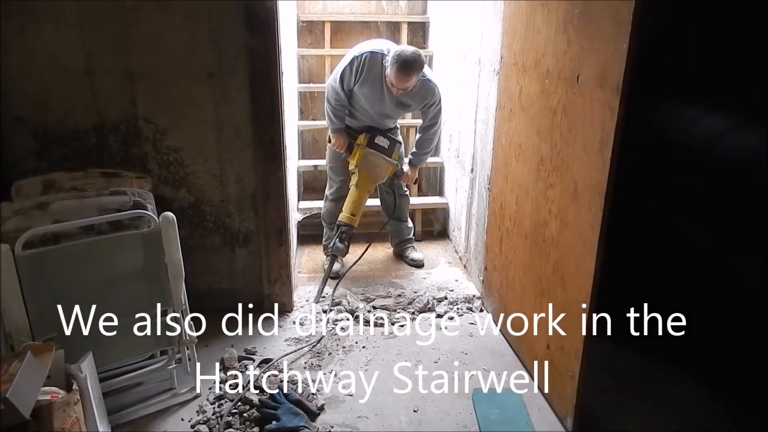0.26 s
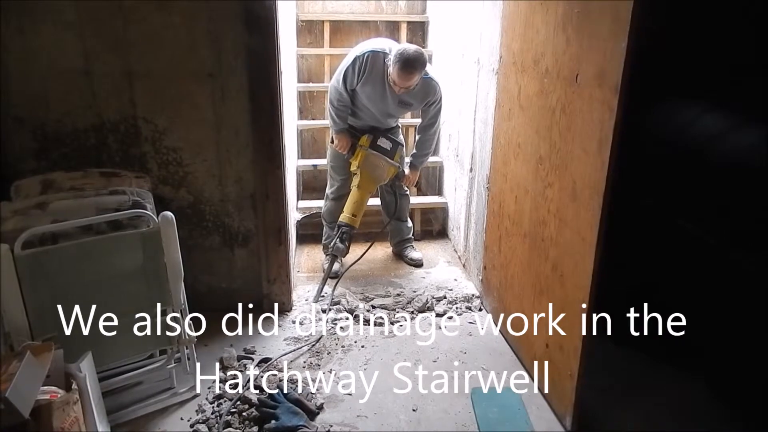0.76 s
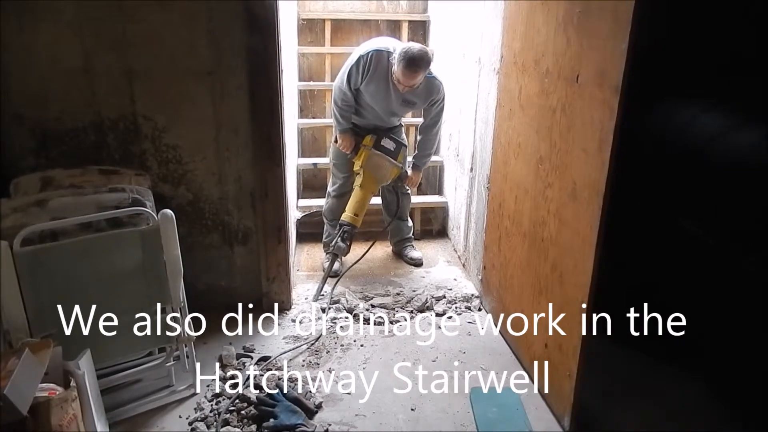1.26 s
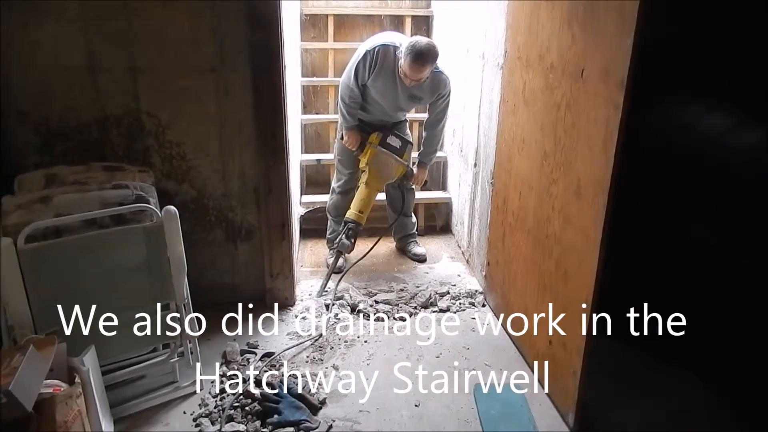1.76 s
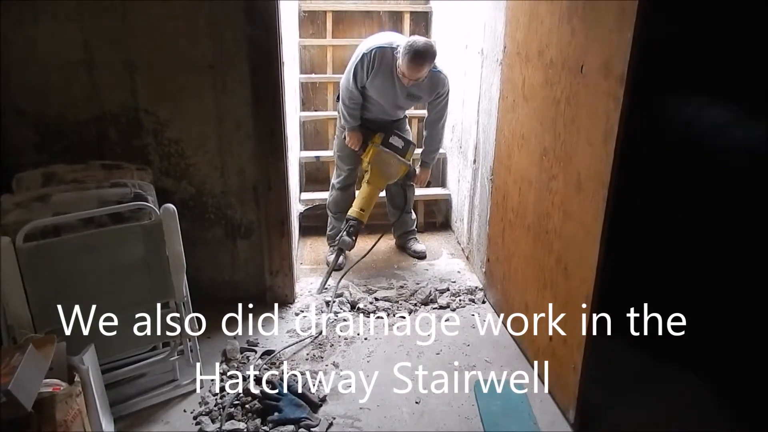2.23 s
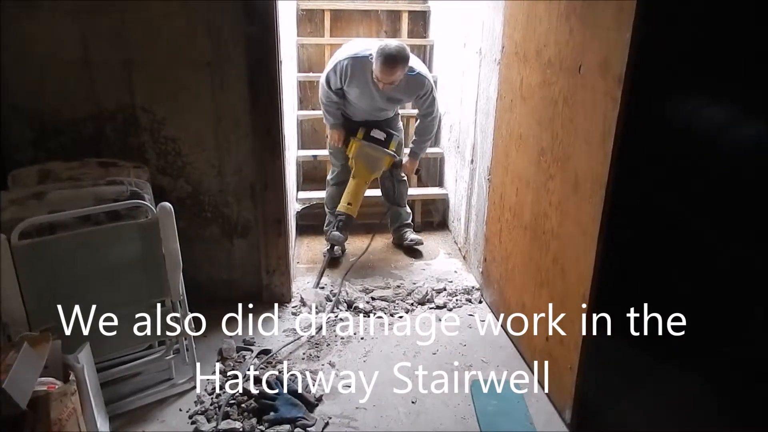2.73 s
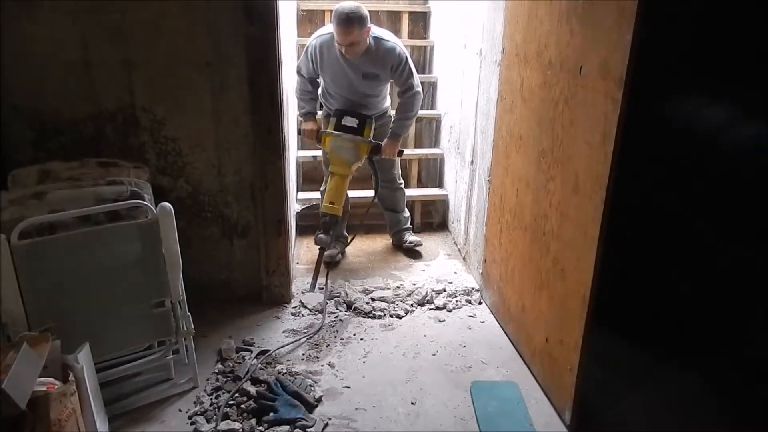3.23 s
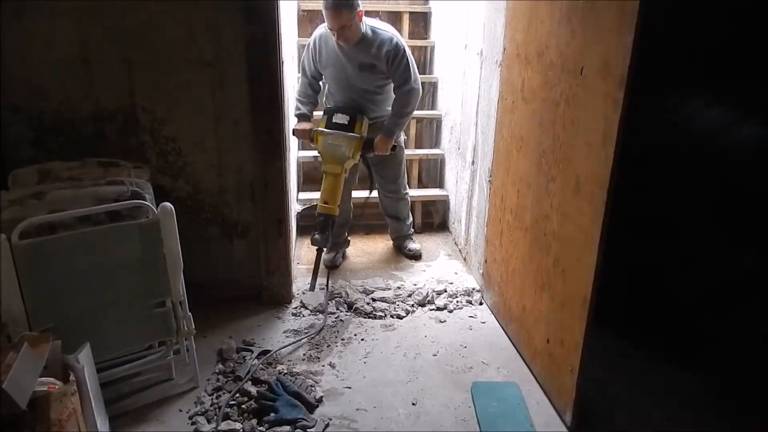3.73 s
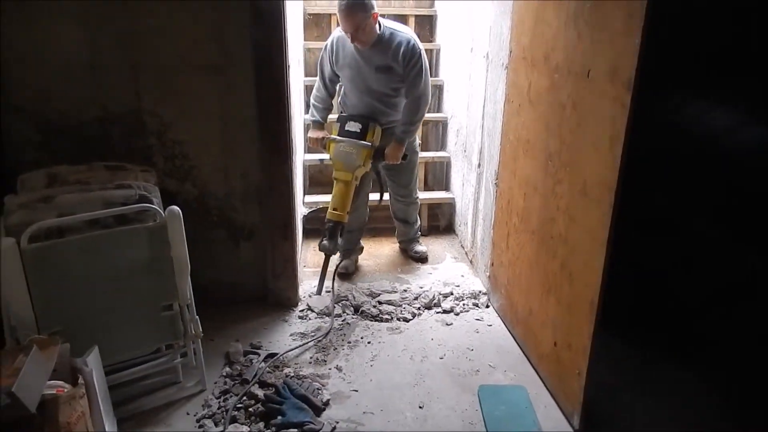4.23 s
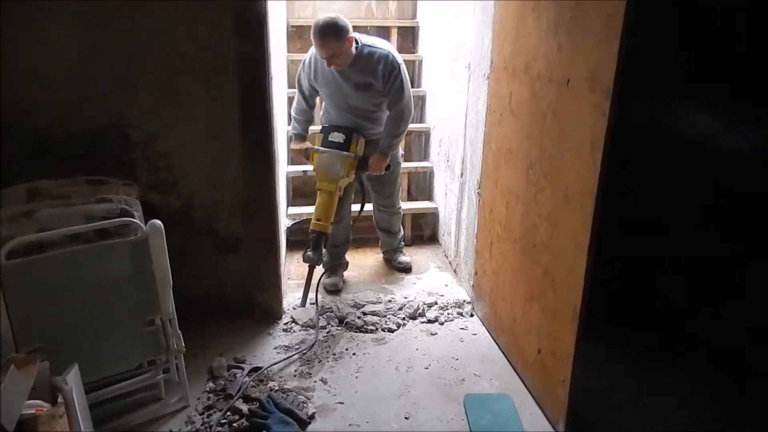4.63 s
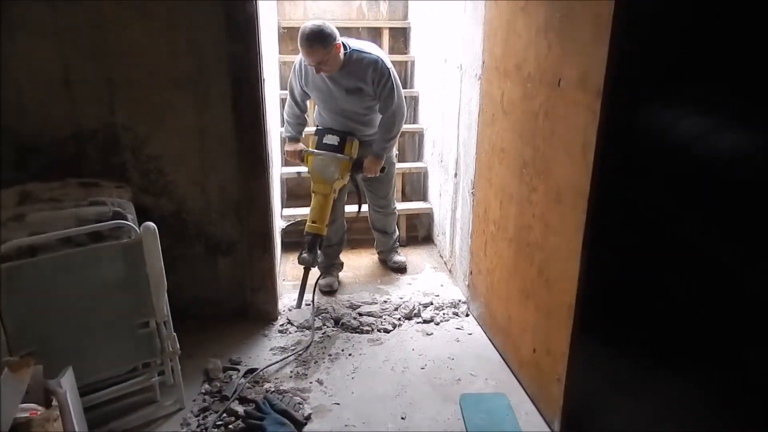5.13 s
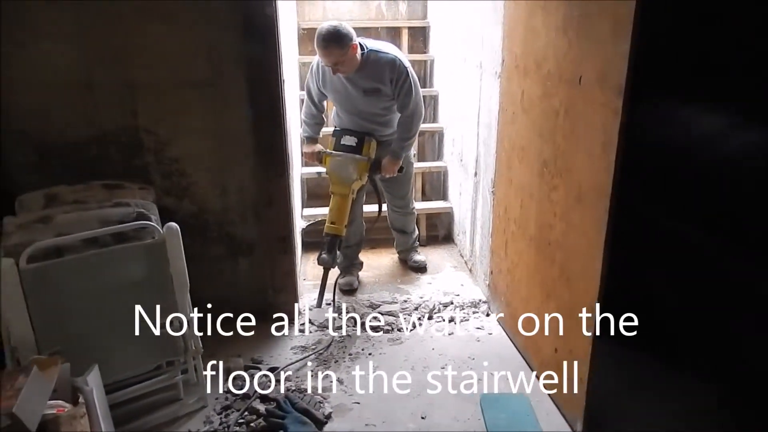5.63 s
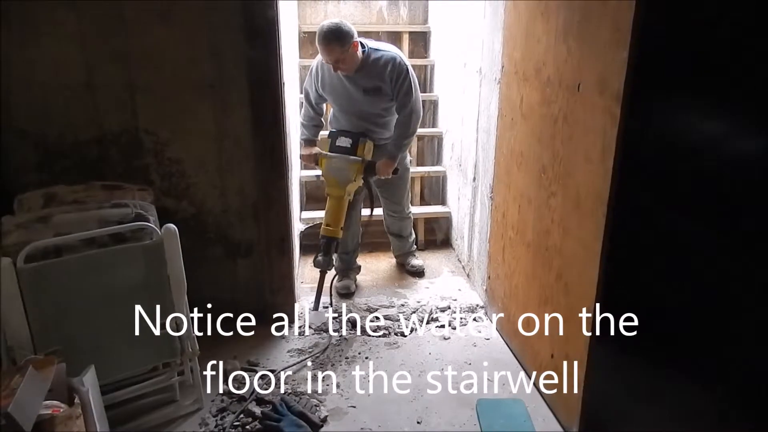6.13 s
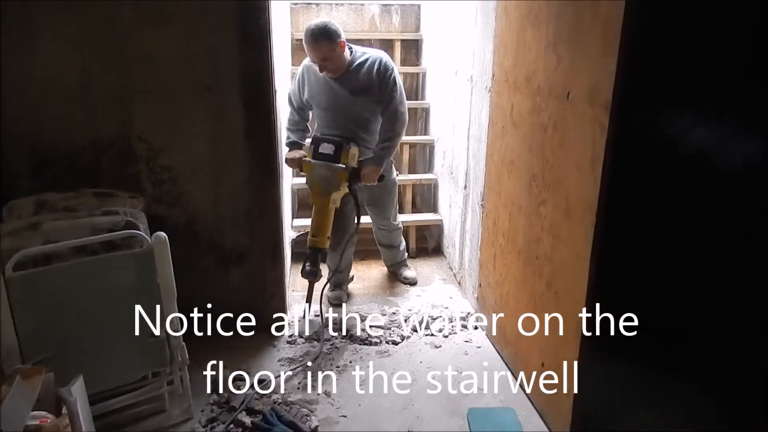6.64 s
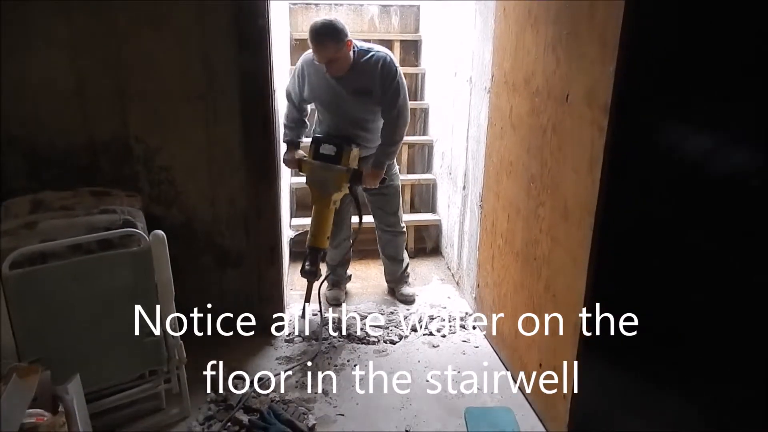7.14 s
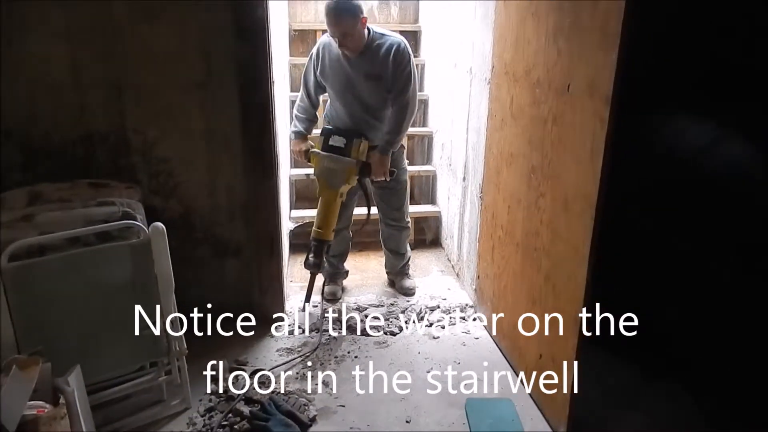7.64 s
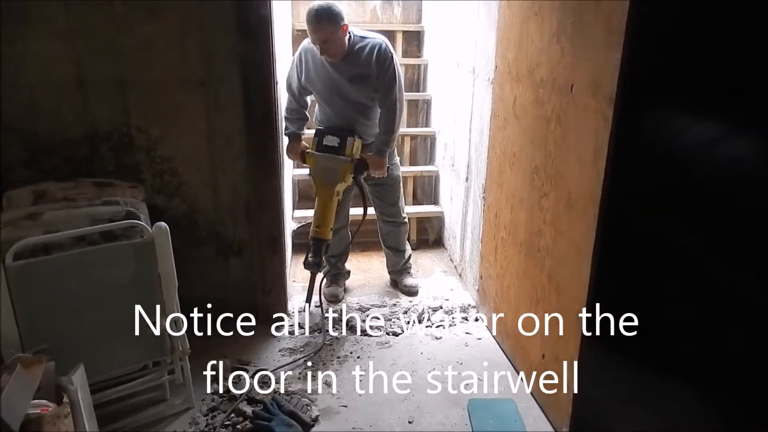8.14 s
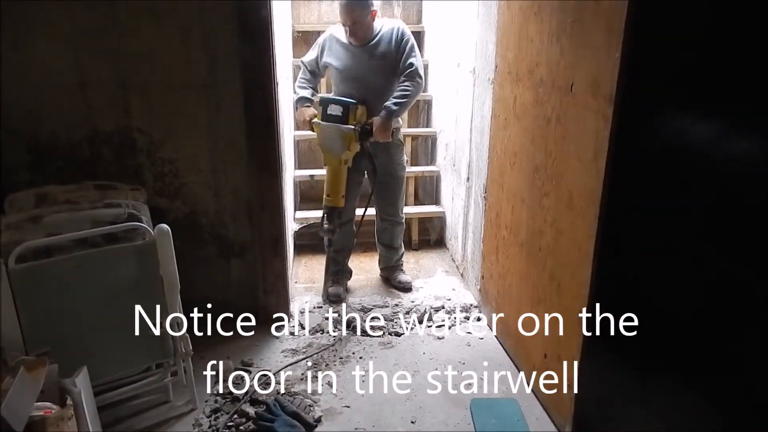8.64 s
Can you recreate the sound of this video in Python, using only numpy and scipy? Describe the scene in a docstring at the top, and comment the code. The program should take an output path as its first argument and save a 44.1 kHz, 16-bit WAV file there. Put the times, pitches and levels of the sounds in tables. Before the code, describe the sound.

An electric demolition hammer pounds concrete at a rapid steady rate in a reverberant stairwell, then slows and drops with a final clank.

```python
"""In a stairwell, an electric demolition hammer chisels a concrete floor, about 14.5 blows a second.
At first the loose slab clacks loudly under the steel; then the bit bites into rubble and rings freely.
The motor coasts down, the blows thin out to idle strokes, and the chisel drops with one last clank.
Knocks, chips and gears are shaped noise, the chisel's ring is clusters of blurred sine lines,
and the motor adds a whine that follows the crank."""
import sys
import numpy as np
from scipy import signal
from scipy.fft import rfft, irfft, next_fast_len
from scipy.io import wavfile
from scipy.ndimage import uniform_filter1d, map_coordinates

SR = 44100
rng = np.random.default_rng(int(sys.argv[2]) if len(sys.argv) > 2 else 0)


def transcribe(u):
    """Save the signal u as a 16-bit wav file named by the first command-line argument.

    u: samples, shape (n,) or (channels, n), limited to [-1, 1]; the rate is SR.
    q: integer samples, one column per channel.
    """
    v = np.clip(np.atleast_2d(u).T, -1, 1)
    q = np.round(v * 32767).astype(np.int16)
    wavfile.write(sys.argv[1], SR, q)


N = 392037
LIFE = np.arange(int(.22 * SR)) / SR  # time axis of one hit (s)
TOOL_DETUNE = .022  # spread of the tool's pitch from blow to blow (share)

# spectrum of the loose slab: (frequency [Hz], level [dB per Hz])
SLAB_SPECTRUM = [(25, -23), (59, -35), (100, -18.5), (149, -23.5), (291, -13), (476, -25), (532, -10.5),
                 (624, -17), (886, -7), (975, -11.5), (1200, -4), (1450, -3), (2030, -7), (2380, -7.5),
                 (3320, -19), (4500, -25.5), (5850, -63), (9900, -120)]
# resonances of the slab: (frequency [Hz], width [Hz], level [dB])
SLAB_RESONANCES = [(275, 90, 3.5), (530, 40, 4), (880, 70, 5.5), (1230, 35, 5), (1287, 27, 6),
                   (1485, 28, 8), (1680, 44, 6.5), (2330, 43, 6), (3000, 120, 6), (3660, 130, 9)]
# spectrum of cracking concrete, also of the air puff: (frequency [Hz], level [dB per Hz])
CHIP_SPECTRUM = [(1200, -42), (2500, 3.5), (4200, -2.5), (6000, 1), (7600, -1), (9800, 2), (10800, 2.5),
                 (11800, -8), (13200, -15), (15500, -26)]
# spectrum of motor and gears, also of the idle strokes: (frequency [Hz], level [dB per Hz])
MOTOR_SPECTRUM = [(30, -26), (70, -9), (160, -16), (300, -7), (450, -4.5), (850, -4.5), (1200, -1),
                  (1700, -0.5), (2500, -6.5), (3300, -7), (5400, -13.5), (7400, -23), (10000, -18.5),
                  (14000, -48)]
# resonances in that spectrum: (frequency [Hz], width [Hz], level [dB])
MOTOR_RESONANCES = [(275, 60, 7), (540, 35, 6), (865, 70, 5), (1400, 200, 2), (2200, 160, 5),
                    (2500, 170, 7), (4420, 170, 7)]
# how hard the bit bears on the concrete: (time [s], chipping [dB], knock [dB]), before trims and scatter
BITE_LEVELS = [(0, -22, -18.5), (.19, -19.5, -17.5), (.32, -25, -24), (.55, -23, -19.5), (1, -22.5, -19.5),
               (1.2, -25, -21), (2.04, -23.5, -20), (2.42, -22.5, -31.5), (2.85, -22, -27.5),
               (3.7, -25.5, -27.5), (4.5, -22.5, -27.5), (4.68, -26.5, -30), (4.92, -18.5, -26),
               (5.13, -26.5, -33), (5.3, -22.5, -23.5), (5.8, -20.5, -29), (6.03, -25, -29.5),
               (6.75, -24, -25), (7.88, -23.5, -28.5), (8.02, -29, -32.5), (8.2, -24, -30.5)]


def amp(db):
    """Decibels to gain."""
    return 10 ** (np.asarray(db) / 20)


def along(points, hz):
    """Read (Hz, value) points on a log frequency axis."""
    f, v = np.transpose(points)
    return np.interp(np.log(hz + 1), np.log(f + 1), v)


def at(curve, s):
    """Each column of a control curve at the times s."""
    times, *columns = np.transpose(curve)
    return np.array([np.interp(s, times, c) for c in columns])


def shape(spectrum, peaks, hz):
    """Level in dB of a broad spectrum with narrow resonances on it."""
    return along(spectrum, hz) + sum(g / (1 + (2 * (hz - c) / w) ** 2) for c, w, g in peaks)


def resonance(hz, centre_hz, width_hz):
    """Response of one damped mode, 1 at its centre."""
    return 1j * hz * width_hz / (centre_hz ** 2 - hz ** 2 + 1j * hz * width_hz)


def filtered(x, response):
    """Filter x by a complex response of frequency."""
    n = x.shape[-1]
    m = next_fast_len(n + 4096)
    return irfft(rfft(x, m) * response(np.fft.rfftfreq(m, 1 / SR)), m)[..., :n]


def colour(x, spectrum, peaks=()):
    """Causal minimum-phase filter with a broad spectrum and narrow resonances on it."""
    m = 2 * len(LIFE)
    hz = np.fft.rfftfreq(m, 1 / SR)
    db = shape(spectrum, peaks, hz)
    # folding the cepstrum forward in time keeps onsets sharp
    cepstrum = irfft(np.log(amp(np.maximum(db, -90))))
    cepstrum[1:m // 2] *= 2
    cepstrum[m // 2 + 1:] = 0
    return irfft(rfft(x, m) * np.exp(rfft(cepstrum)), m)[..., :len(LIFE)]


def sized(x):
    """Scale each channel of a hit so that its energy equals rms 1 over 40 ms."""
    return x / np.sqrt(np.sum(x ** 2, axis=-1, keepdims=True) / (.04 * SR) + 1e-20)


def fade(t60, delay=0):
    """An exponential decay that starts after a delay."""
    return (LIFE >= delay) * amp(-60 * np.abs(LIFE - delay) / t60)


def swell(rise, delay=0):
    """A rounded onset from 0 to 1."""
    return 1 - np.exp(-((LIFE - delay) / rise) ** 2)


def burst(envelope, count=1):
    """Mid/side noise bursts under one envelope."""
    return envelope * rng.standard_normal((count, 2, len(LIFE)))


def even(x, size):
    """Flatten the broad spectrum of a burst and keep its fine comb."""
    z = rfft(x)
    power = np.abs(uniform_filter1d(np.abs(z) ** 2, size))
    return irfft(z / np.sqrt(power + 1e-12), len(LIFE))


def wobble(rate):
    """A smooth random curve, rate knots a second."""
    knots = rng.standard_normal(int(N * rate / SR) + 4)
    return map_coordinates(knots, [np.arange(N) * rate / SR])


def add(track, s, hit):
    """Mix a hit into the track at time s."""
    start = round(s * SR)
    lo, hi = max(start, 0), min(start + len(LIFE), N)
    track[:, lo:hi] += hit[:, lo - start:hi - start]


def crank():
    """Time, speed, and turns of the crank since the first blow; every whole turn is a blow while it strikes."""
    # speed sags under load and coasts down once the trigger is released: (time [s], speed [blows per s])
    crank_speed = [(0, 14.702), (1.4, 14.702), (1.8, 14.507), (2, 14.572), (2.8, 13.769), (3.2, 14.436),
                   (4.4, 14.182), (4.8, 14.376), (6.6, 14.838), (7.4, 14.759), (7.72, 9.177), (7.98, 8.109),
                   (8.15, 5.253), (8.9, 3.3)]
    first_s = -.0145  # the first blow
    t = np.arange(round(first_s * SR), N) / SR
    rate = np.interp(t, *np.transpose(crank_speed))
    return t, rate, np.cumsum(rate) / SR


def blows():
    """One row for each blow or rebound: (s, then dB of chipping, knock, clack, bonk and the five rings)."""
    # how firmly the bit seats in the tool: (time [s], clack [dB], bonk [dB])
    seating = [(0, -58, -38), (2.05, -48, -60), (2.18, -62, -35), (2.45, -48, -49), (2.65, -36, -58),
               (3.5, -37, -44), (3.9, -49, -43), (4.6, -39, -39), (5, -35.5, -41.5), (5.8, -40, -35.5),
               (6.2, -41, -38.5), (7.3, -59, -43), (8.2, -42, -45)]
    # how freely the steel rings as the rubble loosens its grip:
    # (time [s], low bend [dB], bending [dB], lengthwise [dB], high bend [dB], shimmer [dB])
    ring_levels = [(0, -45, -50, -56, -49, -54), (2.2, -41, -55, -42, -52, -43),
                   (2.33, -39, -40, -32, -39, -30.5), (2.8, -35, -36, -38, -37, -33),
                   (3.05, -42.5, -41.5, -42, -36, -43), (3.4, -33.5, -34, -36.5, -39, -31),
                   (3.7, -47, -44, -40, -33, -40), (4.15, -39, -45, -47, -45, -39.5),
                   (4.45, -34, -33, -37, -33, -33), (4.72, -26.5, -27.5, -51, -33, -31),
                   (4.98, -35.5, -29.5, -51, -38, -41), (5.35, -30, -39, -33, -38, -35),
                   (5.95, -31.5, -30.5, -37, -33.5, -40), (6.12, -38, -32, -41, -41, -34),
                   (6.41, -46, -42, -42, -34.5, -34), (6.5, -48, -32, -28.5, -31.5, -34),
                   (7.35, -39.5, -39, -37.5, -41.5, -41), (7.8, -40, -39, -38, -46, -44.5),
                   (8.1, -44, -41, -47, -44, -50)]
    # blows that land squarely or glance off:
    # (time [s], extra chipping [dB], extra knock [dB], extra clack [dB])
    square_blows = [(.122, 0, -0.5, -2), (.258, -6, -6, 0), (2.168, 1, -1, 2), (2.45, -4, 2, -10),
                    (3.09, 0.5, 0.5, -11), (3.233, 3, -1.5, 4.5), (3.51, -0.5, 0, -12), (3.65, 1, -1, -14),
                    (3.79, 1, -3.5, -12), (3.86, 2.5, 2, 12), (3.93, 4, 3, 9), (4.28, 1, -1.5, 12),
                    (4.49, -1, 4.5, -2), (4.7, -1, -2, -9), (4.841, 0, 5, 5), (4.91, -2, 1, 1),
                    (5.26, 1.5, 1, 0), (5.6, 0.5, 2, 8.5), (5.74, -3, 2.5, 5), (5.81, -1.5, 2.5, 5),
                    (7.024, 0, 3, -3), (7.506, 3, 2, 0), (8.2, -4.5, 0, -6)]
    # blows after which the chisel jumps free and pings, or is choked:
    # (time [s], extra low bend [dB], bending [dB], lengthwise [dB], high bend [dB], shimmer [dB])
    pings = [(2.38, -13, 5, -4, 0, 4), (2.45, -2, 7, 0, 6, 3), (3.09, 1, 11, 5, 0, 0),
             (3.16, 7, 9, -2, 0, -5), (3.233, 12.5, 7, 6, 9.5, 3), (3.51, 1.5, 0.5, 3, 2, 4),
             (3.65, 10, 2, -6, 2, 0), (3.93, 0, 2, 7, -3, 0), (4, -8, 6, 8, 5, 8),
             (4.63, 0.5, 5.5, 0, 0, 0), (4.841, 8, 1.5, 0, 2, 3), (5.05, 7.5, -2, 0, 9.5, 0),
             (5.26, 6, 3, -6, 4, 4), (5.46, -1, 9.5, -5, 0, -10), (5.6, 1, 9, 1, 5.5, 0),
             (5.87, 4, 5, -4, -4, 0), (6.62, 9, -3, 1.5, -3, 0), (6.76, 7, -1, 5, -2, 0),
             (6.82, 3, -4, -9, 0, 0), (7.024, 0, 7, 9, 6, 0), (7.36, 6, 6, 9.5, 14, 4),
             (7.68, -1.5, 0, 8, 5, 0)]
    # the bit jumps and lands again between two blows: (time [s], chipping [dB], knock [dB])
    landings = [(.215, -27, -32), (.235, -26, -30), (8.064, -35, -36)]
    last_s = 8.3  # from here the piston is too slow to strike

    t, _, turns = crank()
    s = np.interp(np.arange(np.interp(last_s, t, turns)), turns, t)
    scatter_db = [1, 1] + [1.5] * 7  # chance from blow to blow: chipping, knock, then the ringing parts
    levels = np.vstack([at(BITE_LEVELS, s), at(seating, s), at(ring_levels, s)]).T
    levels = levels + scatter_db * rng.standard_normal((len(s), len(scatter_db)))
    for when, *extra_db in square_blows:
        levels[np.argmin(np.abs(s - when)), :len(extra_db)] += extra_db
    for when, *extra_db in pings:
        levels[np.argmin(np.abs(s - when)), -len(extra_db):] += extra_db
    rebounds = [(*row, *at(seating, row[0]), *at(ring_levels, row[0])) for row in landings]
    return np.vstack([np.column_stack([s, levels]), rebounds])


def knocks(count, bounces, spectrum, peaks, contact_t60, room_db, room_t60, dull_hz, fresh):
    """Each blow repeats one pattern of bright contacts and duller echoes, with a share that is new every time."""
    contacts = echoes = 0
    for s, db in bounces:
        delay = s - bounces[0][0]
        onset = amp(db) * swell(.0011, delay)
        contacts += (onset * fade(contact_t60, delay)) ** 2
        echoes += (onset * amp(room_db) * fade(room_t60, delay)) ** 2

    def dulling(hz):
        return (1 + (hz / dull_hz) ** 4) ** -.5

    def pattern(count):
        bright = burst(np.sqrt(contacts), count)
        return bright + filtered(burst(np.sqrt(echoes), count), dulling)

    def share(hz):
        return np.clip(along(fresh, hz), 0, 1)

    same = sized(even(pattern(count=1), size=27))
    new = sized(pattern(count))
    mix = filtered(same, lambda hz: np.sqrt(1 - share(hz))) + filtered(new, lambda hz: np.sqrt(share(hz)))
    return sized(colour(mix, spectrum, peaks))


def rocked(hit, detune):
    """Slab and tool never sit the same way twice: the pitch shifts and the contacts trade strength."""
    clock = LIFE * (1 + detune * rng.standard_normal())
    knots = np.arange(0, LIFE[-1], .005)  # s
    rattle_db = 1.1 * np.interp(LIFE, knots, rng.standard_normal(len(knots)))
    return sized(amp(rattle_db) * np.array([np.interp(clock, LIFE, channel) for channel in hit]))


def slab_knocks(count):
    """The loose slab rattles under the steel in a close run of contacts; returns first delay (s) and hits."""
    # contacts within one blow: (delay [s], level [dB])
    slab_contacts = [(-.003, -7), (.0013, 2), (.0038, 1), (.0115, -.5), (.0155, -.5), (.0235, -11),
                     (.032, -11)]
    hits = knocks(count, slab_contacts, SLAB_SPECTRUM, SLAB_RESONANCES, contact_t60=.015,
                  room_db=-21.5, room_t60=.26, dull_hz=2000,
                  fresh=[(60, .3), (300, .08), (1800, .17), (3500, .5)])  # (Hz, share)
    return slab_contacts[0][0], hits


def tool_knocks(rows):
    """The tool knocks on rubble over a booming floor, duller with depth; returns first delay (s) and hits."""
    # contacts within one blow: (delay [s], level [dB])
    tool_contacts = [(-.0012, -9), (.0022, -10.5), (.0045, -13), (.0142, -11)]
    # spectrum of the tool: (frequency [Hz], level [dB per Hz])
    tool_spectrum = [(18, -20), (30, -35), (86, -10.5), (150, -13), (250, -6.5), (380, -4), (469, -12),
                     (542, -7.5), (640, -7.5), (837, -6), (1060, -6.5), (1430, -8), (2040, -3.5),
                     (2720, -13), (3020, -8), (3350, -9.5), (4200, -10.5), (5460, -37), (9240, -120)]
    # resonances of the tool: (frequency [Hz], width [Hz], level [dB])
    tool_resonances = [(545, 40, 5.5), (713, 90, 5), (850, 80, 3)]
    # the floor booms higher as the chisel moves to a new spot: (time [s], boom [Hz])
    floor_boom = [(2.3, 270), (3.8, 280), (4.4, 350), (8.2, 357)]
    # the knock dulls and clears with the bit's depth in the rubble: (time [s], thud over clack [dB])
    depth = [(2.2, 9), (2.8, -10), (3.3, 0.5), (3.7, -2), (4.3, 4), (4.9, -0.5), (5.7, -3.5), (6.3, 2.5),
             (6.9, 5), (7.5, 2.5), (8.2, 6)]

    tool = knocks(len(rows), tool_contacts, tool_spectrum, tool_resonances, contact_t60=.023,
                  room_db=-15, room_t60=.24, dull_hz=2800,
                  fresh=[(60, .45), (300, .18), (800, .3), (1600, .6), (3500, .8)])  # (Hz, share)
    floor_hz = at(floor_boom, rows[:, 0])[0][:, None, None]
    tool = sized(filtered(tool, lambda hz: 1 + amp(2) * resonance(hz, floor_hz, width_hz=55)))
    # the thud is the band from about 220 to 1500 Hz
    thud = filtered(tool, lambda hz: 1 / (1 + (hz / 1500) ** 4) - 1 / (1 + (hz / 220) ** 6))
    thud_db = at(depth, rows[:, 0])[0] + rng.standard_normal(len(rows))
    return tool_contacts[0][0], sized(tool + (amp(thud_db)[:, None, None] - 1) * thud)


def pitched_knock(hz, delay, rise, t60):
    """One short ring of the tool, a little off pitch and at a random phase every time."""
    detune = 1 + TOOL_DETUNE * rng.standard_normal()
    phase = 2 * np.pi * (hz * detune * LIFE + rng.random((2, 1)))
    return sized(np.sin(phase) * swell(rise, delay) * fade(t60, delay))


def chipping(count, crack_db, crack_t60, rebound_s, rebound_db, crumble_t60, room_db, room_t60):
    """Concrete cracks under the tip, again as the bit rebounds, and crumbles; the stairwell carries it on."""
    # the bit, held by the concrete, colours the crack: (frequency [Hz], width [Hz], level [dB])
    held_bit = [(4386, 150, 7), (9780, 110, 5)]
    crack = amp(crack_db + rng.uniform(-5, 3, (count, 1, 1))) * fade(crack_t60)
    rebound = amp(rebound_db) * fade(crack_t60, rebound_s)
    room = amp(room_db) * fade(room_t60)
    envelope = np.sqrt(crack ** 2 + rebound ** 2 + fade(crumble_t60) ** 2 + room ** 2)
    return sized(colour(burst(envelope * swell(.0013), count), CHIP_SPECTRUM, held_bit))


def chisel_ring(count, modes, rise, held, blur_hz, room_db, room_t60, scatter_db):
    """The steel rings until the tool presses it back into the concrete; echoes blur each line."""
    grip = held * np.exp(.2 * rng.standard_normal((count, 1, 1)))
    free = swell(rise) / np.sqrt(1 + (LIFE / grip) ** 8)
    offsets = np.linspace(-3, 3, num=25)  # sines around each mode, in blur widths
    rings = 0
    for centre, db, t60 in modes:
        envelope = free * fade(t60) + amp(room_db) * swell(held) * fade(room_t60)
        waves = np.exp(2j * np.pi * (centre + blur_hz * offsets)[:, None] * LIFE)
        pinch = 0.94 * rng.standard_normal((count, 1, 1))  # the grip of the rubble shifts the pitch
        weights = np.tile(np.exp(-(offsets - pinch) ** 2 / 2), 2)
        paths = weights * rng.standard_normal((count, 2, weights.shape[-1]))
        strength = amp(db + scatter_db * rng.standard_normal((count, 1, 1)))
        lines = paths @ np.vstack([waves.real, waves.imag])
        rings = rings + strength * sized(envelope * lines)
    return sized(rings)


def chisel_rings(count):
    """Five families of chisel modes ring after each blow, in the order of the ring levels."""
    # lower side-to-side modes: (frequency [Hz], level [dB], t60 [s])
    low_bend = [(3025, 0, .16), (3130, -6, .1)]
    # bending modes: (frequency [Hz], level [dB], t60 [s])
    bending = [(4780, 1.5, .27), (4970, -1.5, .2), (6885, -3.5, .4), (7100, -3.5, .4)]
    # mode along the steel: (frequency [Hz], level [dB], t60 [s])
    lengthwise = [(5495, 0, .5)]
    # upper bending modes: (frequency [Hz], level [dB], t60 [s])
    high_bend = [(9215, 0, .4), (9570, -5, .3), (11730, -5, .6), (12280, -15, .4)]
    # highest, glassy modes: (frequency [Hz], level [dB], t60 [s])
    shimmer = [(10735, 0, 1), (14450, -29, .17), (15655, -20, .15)]
    return [
        chisel_ring(count, low_bend, rise=.004, held=.028, blur_hz=36, room_db=-17, room_t60=.28, scatter_db=2),
        chisel_ring(count, bending, rise=.006, held=.031, blur_hz=32, room_db=-14, room_t60=.3, scatter_db=3.5),
        chisel_ring(count, lengthwise, rise=.004, held=.032, blur_hz=30, room_db=-14, room_t60=.28,
                    scatter_db=2.5),
        chisel_ring(count, high_bend, rise=.003, held=.032, blur_hz=26, room_db=-12, room_t60=.28, scatter_db=3),
        chisel_ring(count, shimmer, rise=.004, held=.032, blur_hz=24, room_db=-11, room_t60=.28, scatter_db=3)]


def hammer():
    """Every blow chips the concrete, knocks the tool or the loose slab, and rings the chisel."""
    # share of the knock's power that comes from the loose slab: (time [s], share [0-1])
    slab_share = [(0, 0.95), (2.17, 0.93), (2.26, 0), (2.5, 0.02)]
    rows = blows()
    count = len(rows)
    slab_delay, slab = slab_knocks(count)
    tool_delay, tool = tool_knocks(rows)
    chips = chipping(count, crack_db=4.5, crack_t60=.035, rebound_s=.0145, rebound_db=-2,
                     crumble_t60=.14, room_db=-5, room_t60=.34)
    rings = chisel_rings(count)
    track = np.zeros((2, N))
    for k, (s, chip_db, knock_db, clack_db, bonk_db, *ring_db) in enumerate(rows):
        loose = np.clip(at(slab_share, s), 0, 1)
        add(track, s + slab_delay, amp(knock_db - 0.5) * np.sqrt(loose) * rocked(slab[k], detune=.005))
        add(track, s + tool_delay, amp(knock_db - 3.17) * np.sqrt(1 - loose) * rocked(tool[k], TOOL_DETUNE))
        # a hard clack and a hollow bonk after it
        clack = pitched_knock(hz=1990, delay=0.001, rise=0.00095, t60=0.077)
        bonk = pitched_knock(hz=845, delay=0.0089, rise=0.0047, t60=0.06)
        add(track, s, amp(clack_db) * clack + amp(bonk_db) * bonk)
        add(track, s, amp(chip_db - 3.5) * chips[k])
        add(track, s, sum(amp(db) * ring[k] for db, ring in zip(ring_db, rings)))
    return track


def motor():
    """Fan noise, chattering gears, and a whine that follows the speed and sags as the piston packs its air."""
    # fan and gear noise: (time [s], level [dB]), before the surge of each stroke
    noise_level = [(0, -29.5), (.25, -29), (.31, -33), (.45, -31), (2.1, -30.5), (2.5, -37.5), (4.5, -34),
                   (7.4, -34), (7.8, -35), (8.3, -39), (8.65, -38), (8.9, -41)]
    t, rate, stroke = [v[-N:] for v in crank()]
    speed = rate / rate.max()

    whine_order = 596  # cycles of armature whine per blow
    sag = 0.0184 * np.cos(2 * np.pi * (stroke - .35))
    whine_hz = whine_order * rate * (1 + sag + 0.0091 * wobble(10))
    whine_db = -47 + 44 * np.log10(speed)  # falls 44 dB as the speed drops tenfold
    whine = amp(whine_db) * np.sin(2 * np.pi * np.cumsum(whine_hz) / SR)
    walls = burst(fade(0.0069))[0]  # the stairwell smears the whine
    whine = signal.fftconvolve(whine[None], walls / np.linalg.norm(walls[0]), axes=1)[:, :N]

    noise = filtered(rng.standard_normal((2, N)),
                     lambda hz: amp(shape(MOTOR_SPECTRUM, MOTOR_RESONANCES, hz)))
    noise *= amp(1.6 * wobble(28) + 3 * speed * wobble(180))  # slow flutter and gear chatter
    casing = burst(fade(.3))[0]  # casing and stairwell pick out many narrow tones
    noise = noise + signal.fftconvolve(noise, casing / np.linalg.norm(casing[0]), axes=1)[:, :N]

    # the motor labours once a stroke, loudest just ahead of the blow
    surge_db = 2.2 * speed ** 2 * np.cos(2 * np.pi * (stroke + .03))
    noise_db, = at(noise_level, t)
    return whine + amp(noise_db + surge_db) * noise / noise.std()


def piston():
    """Ahead of each blow the piston turns with a dull clunk and drives out air; both fade as the crank slows."""
    # spectrum of the clunk: (frequency [Hz], level [dB per Hz])
    clunk_spectrum = [(25, -20), (90, -9.5), (300, 7), (650, 5.5), (1400, -22)]
    t, rate, stroke = [v[-N:] for v in crank()]
    chip_db, knock_db = at(BITE_LEVELS, t)

    def stroke_noise(spectrum, turn, width, level_db):
        """Noise that swells once a turn; turn and width in turns of the crank."""
        noise = filtered(rng.standard_normal((2, N)), lambda hz: amp(along(spectrum, hz)))
        away = (stroke - turn + .5) % 1 - .5
        return amp(level_db) * np.exp(-(away / width) ** 2) * noise / noise.std()

    clunk = stroke_noise(clunk_spectrum, turn=-.32, width=.04, level_db=knock_db - 8)
    puff = stroke_noise(CHIP_SPECTRUM, turn=-.11, width=.14, level_db=chip_db - 12)
    return (clunk + puff) * (rate / rate.max()) ** 3


def single_hits(events, spectrum, peaks, rise):
    """Single rough sounds apart from the regular blows, as coloured noise bursts."""
    track = np.zeros((2, N))
    for s, db, t60 in events:
        hit = burst(fade(t60) * swell(rise))[0]
        add(track, s, amp(db) * sized(colour(hit, spectrum, peaks)))
    return track


def crunch():
    """The slab gives way with a crunch of sharp bursts in the slab's own colour."""
    # bursts of the crunch: (time [s], level [dB], t60 [s])
    cracks = [(.2025, -20, .06), (.2235, -25, .08), (.2545, -20.5, .04)]
    return single_hits(cracks, SLAB_SPECTRUM, SLAB_RESONANCES, rise=0.00047)


def stray_ping():
    """One stray ping at a pitch of its own."""
    # its mode: (frequency [Hz], level [dB], t60 [s])
    stray_mode = [(6570, 0, .4)]
    ping = chisel_ring(1, stray_mode, rise=.003, held=.04, blur_hz=20, room_db=-8, room_t60=.4, scatter_db=0)
    track = np.zeros((2, N))
    add(track, 2.952, amp(-35) * ping[0])
    return track


def idle_strokes():
    """Idle strokes of the slowing piston: soft-edged bursts coloured like the motor noise."""
    # bursts of the idle strokes: (time [s], level [dB], t60 [s])
    soft_bursts = [(8.255, -38, 0.18), (8.415, -35.5, 0.27), (8.555, -39.5, 0.18), (8.64, -34, 0.29)]
    return single_hits(soft_bursts, MOTOR_SPECTRUM, MOTOR_RESONANCES, rise=.005)


def drops():
    """An idle stroke knocks, then the chisel lands and bounces; floor and stairwell ring at their resonances."""
    # the idle knock, the landing and its bounce: (time [s], level [dB], t60 [s])
    last_hits = [(8.425, -39, 0.23), (8.714, -20.5, 0.19), (8.727, -24, 0.12)]
    # spectrum of the clank: (frequency [Hz], level [dB per Hz])
    clank_spectrum = [(60, -25), (170, -24), (380, -11), (520, -9), (680, 5), (1000, -12), (1600, -6),
                      (2300, -11.5), (3100, -6.5), (4000, -9.5), (5000, -7.5), (7500, -14), (9500, -8.5),
                      (11000, -19), (14500, -42)]
    # ringing of floor and stairwell: (frequency [Hz], width [Hz], level [dB])
    clank_resonances = [(242, 14, 16.5), (513, 7.3, 10), (820, 36, 1), (1690, 130, 5), (3100, 200, 2)]
    return single_hits(last_hits, clank_spectrum, clank_resonances, rise=0.00064)


def scene():
    """All sources as mid and side: deepest rumble wide, low and middle range nearly central, treble wide again."""
    # stereo width: (frequency [Hz], side minus mid [dB])
    width = [(30, 4), (80, -8.5), (170, -9), (380, -11.5), (1300, -11.5), (2400, -10), (4400, -5),
             (8100, -2.5), (13000, 0)]
    # stereo balance: (frequency [Hz], left minus right [dB])
    lean = [(60, 0), (110, -3.5), (200, -3), (380, -2.5), (700, -3), (1290, -2.5), (2380, -3), (4400, 0.5),
            (8120, -2), (15000, -0.5)]
    both = hammer() + motor() + piston() + crunch() + stray_ping() + idle_strokes() + drops()
    mid, side = filtered(both, lambda hz: np.array([np.ones_like(hz), amp(along(width, hz))]))
    stereo = np.array([mid + side, mid - side])
    return filtered(stereo, lambda hz: amp(np.outer([.5, -.5], along(lean, hz))))


def record(dry):
    """Everything below the crossover comes through a moment after the treble; then the band limit."""
    lag = .0215  # s
    crossover_hz, top_hz = 3950, 15900
    lead = round(lag * SR)

    def response(hz):
        low = 1 / (1 + (hz / crossover_hz) ** 20)
        late_low = np.sqrt(low) * np.exp(-2j * np.pi * hz * lag)
        return (late_low + np.sqrt(1 - low)) * (hz < top_hz)

    # the mirrored opening fills the lag, so the lows sound from the first moment
    running = np.pad(dry, ((0, 0), (lead, 0)), mode="reflect")
    return filtered(running, response)[:, lead:]


dry = scene()
out = record(dry)
transcribe(out)
```